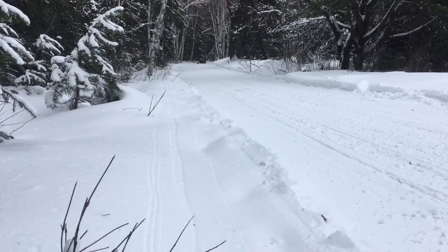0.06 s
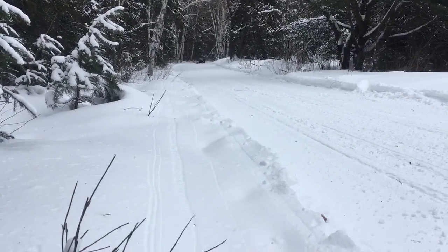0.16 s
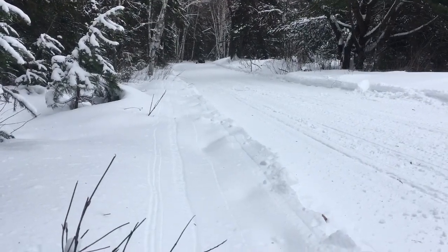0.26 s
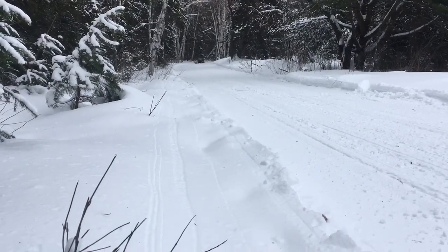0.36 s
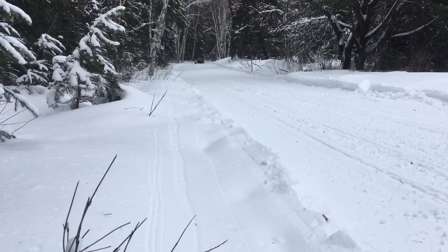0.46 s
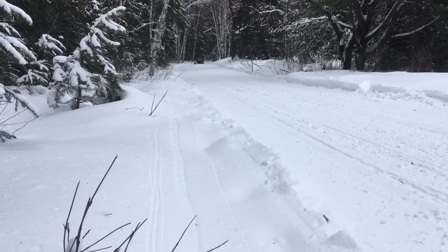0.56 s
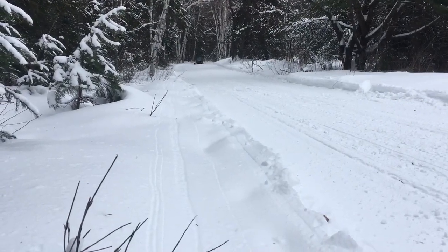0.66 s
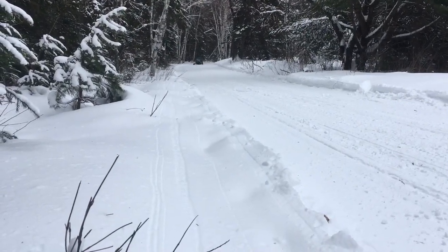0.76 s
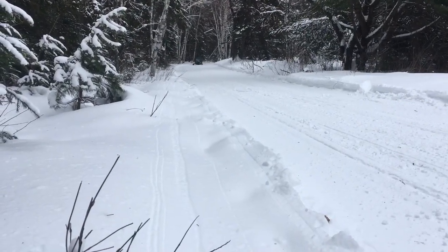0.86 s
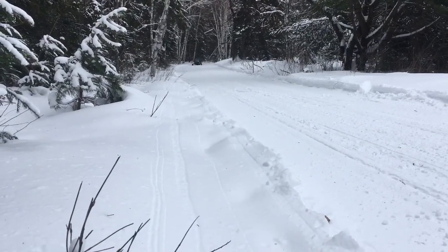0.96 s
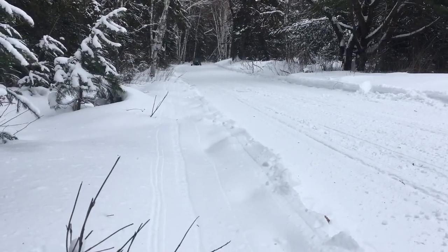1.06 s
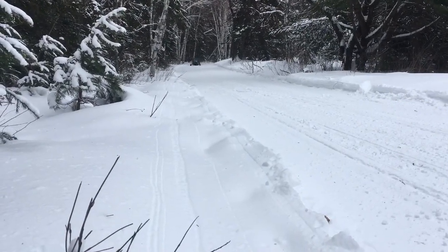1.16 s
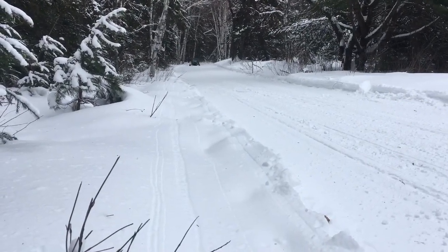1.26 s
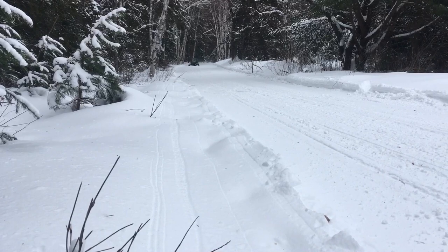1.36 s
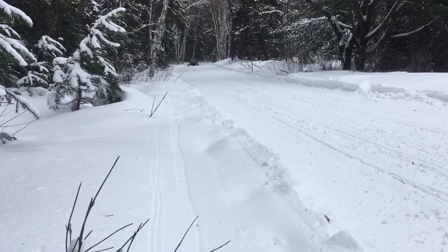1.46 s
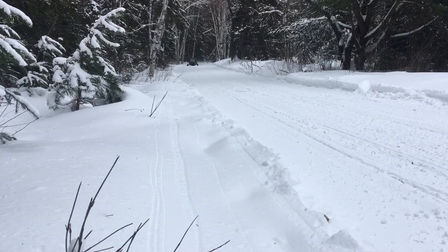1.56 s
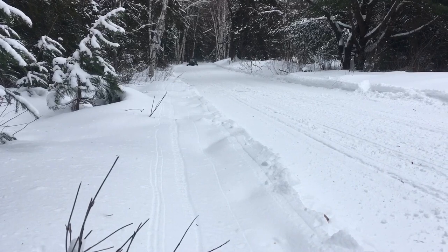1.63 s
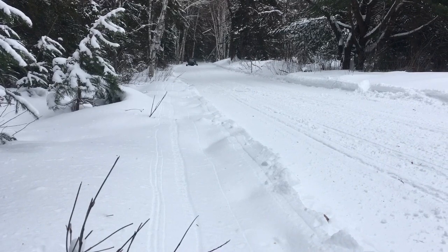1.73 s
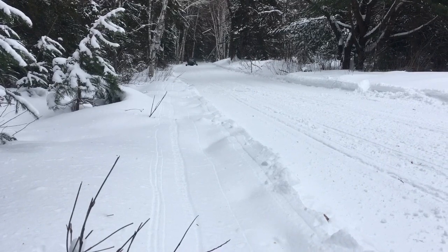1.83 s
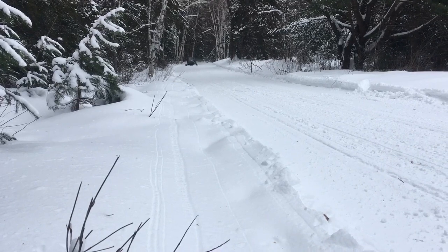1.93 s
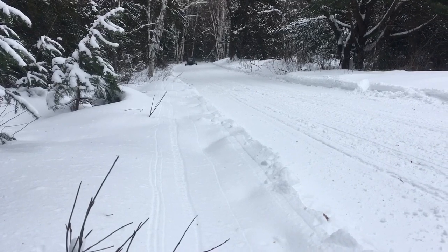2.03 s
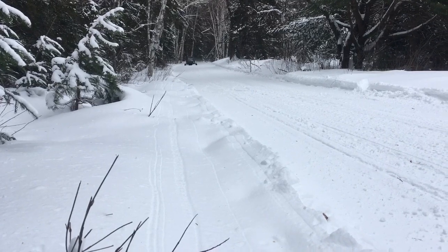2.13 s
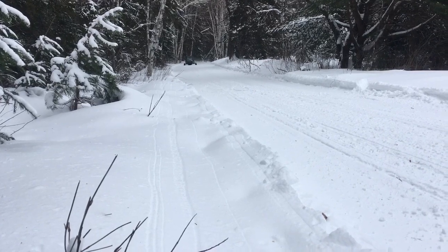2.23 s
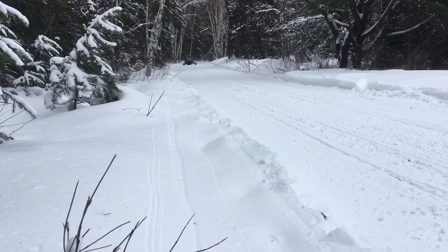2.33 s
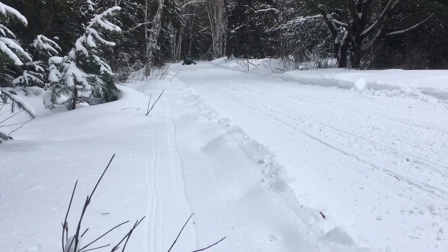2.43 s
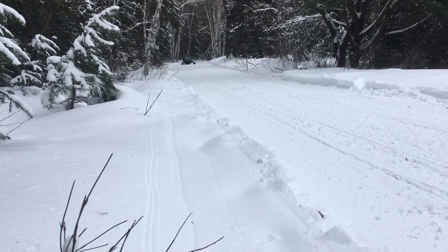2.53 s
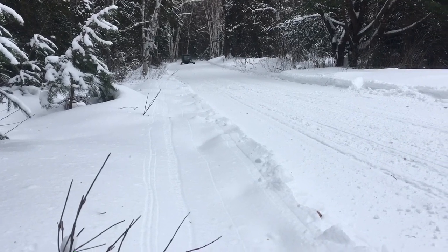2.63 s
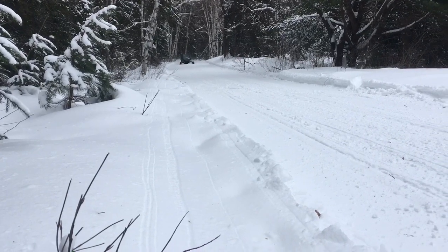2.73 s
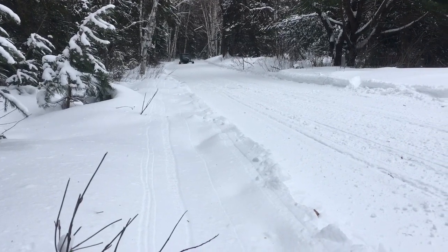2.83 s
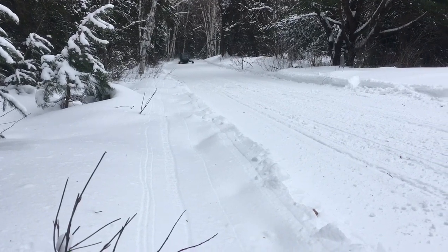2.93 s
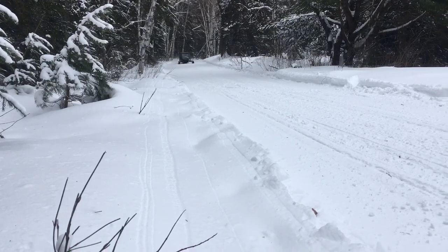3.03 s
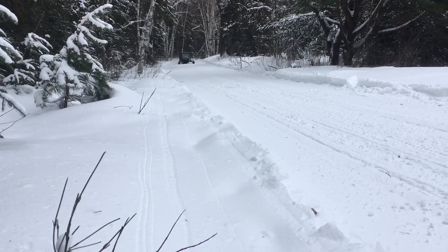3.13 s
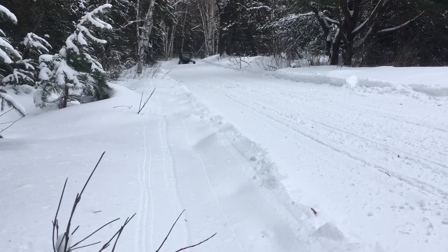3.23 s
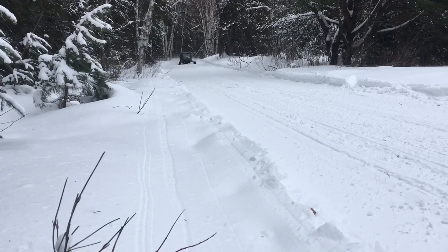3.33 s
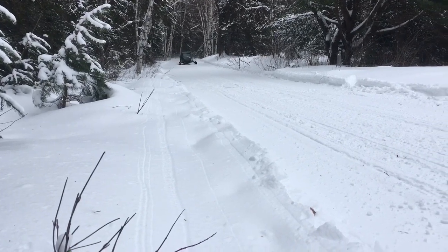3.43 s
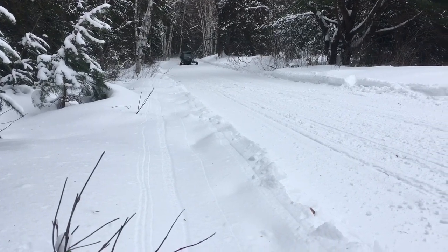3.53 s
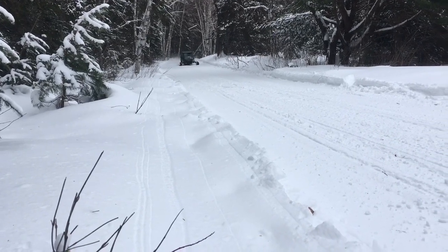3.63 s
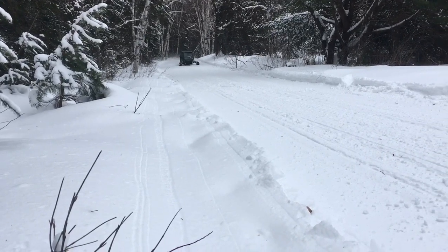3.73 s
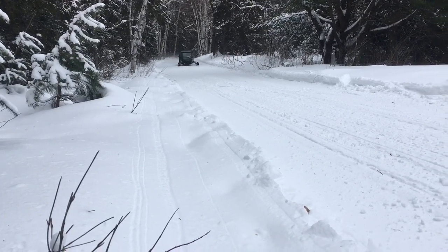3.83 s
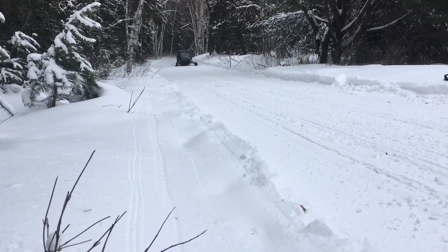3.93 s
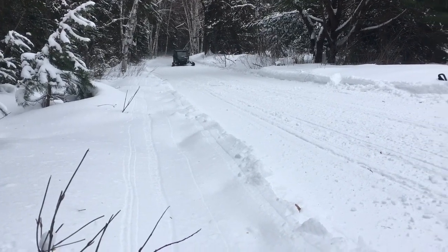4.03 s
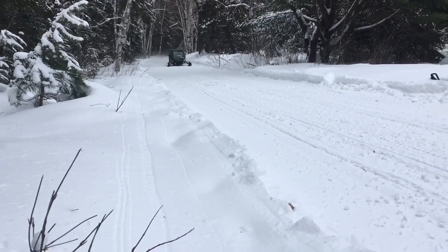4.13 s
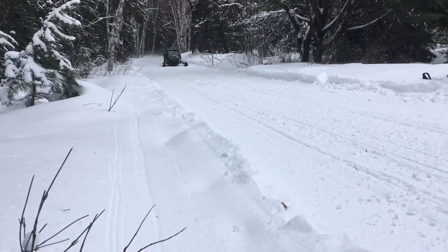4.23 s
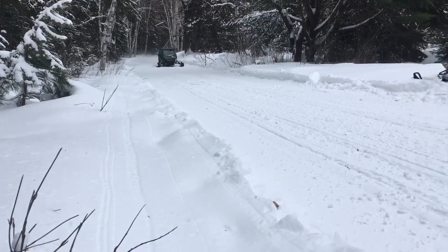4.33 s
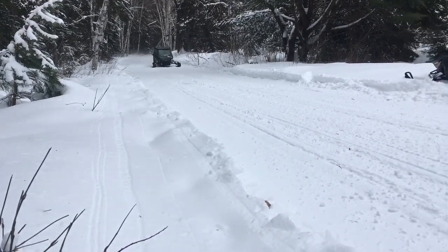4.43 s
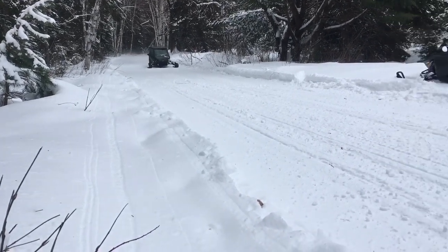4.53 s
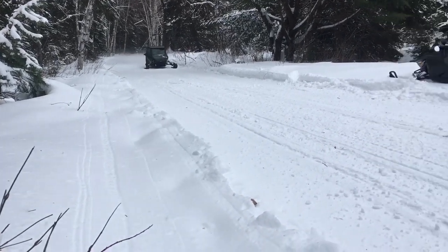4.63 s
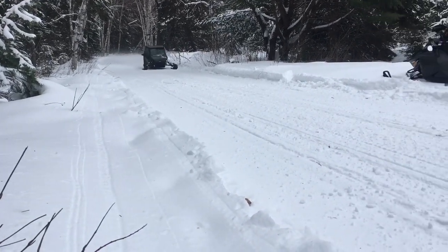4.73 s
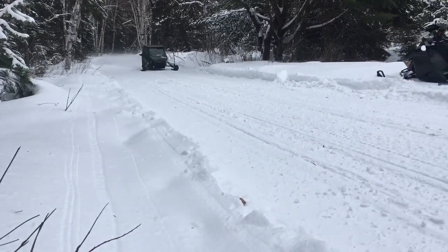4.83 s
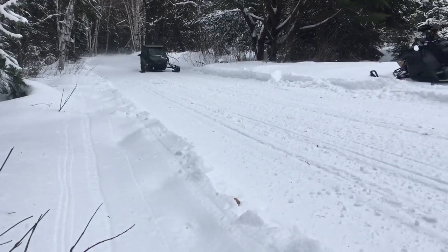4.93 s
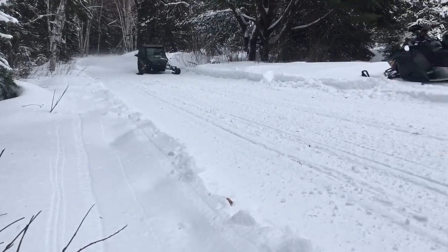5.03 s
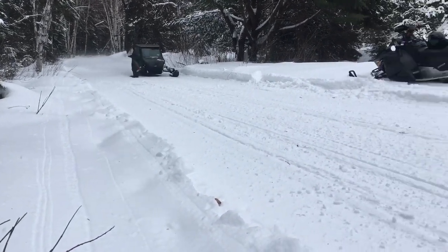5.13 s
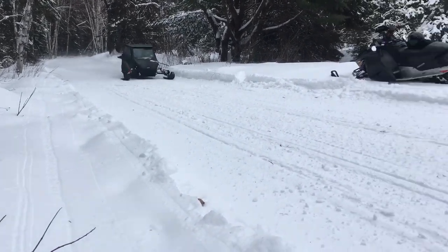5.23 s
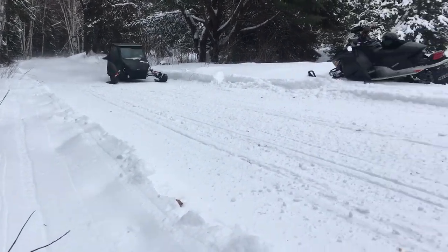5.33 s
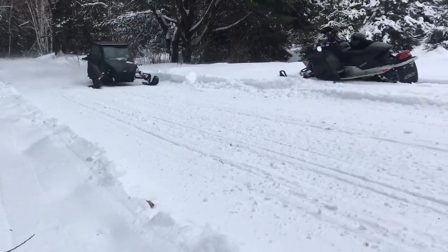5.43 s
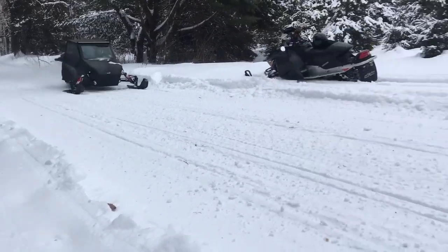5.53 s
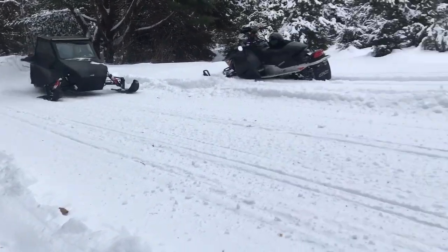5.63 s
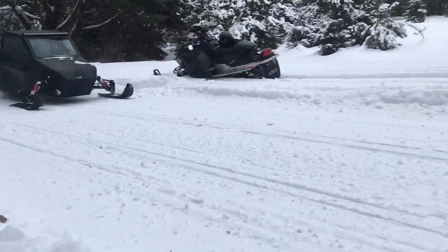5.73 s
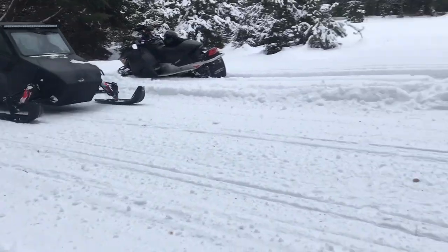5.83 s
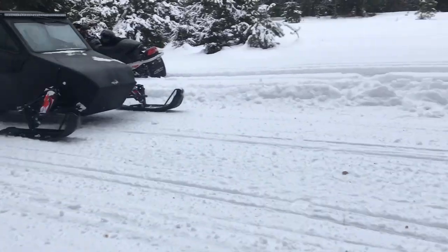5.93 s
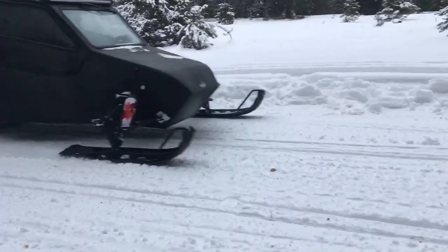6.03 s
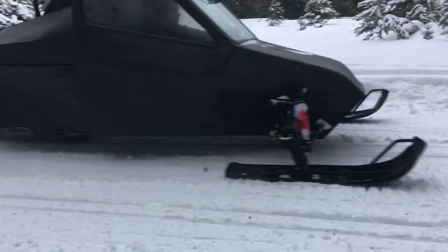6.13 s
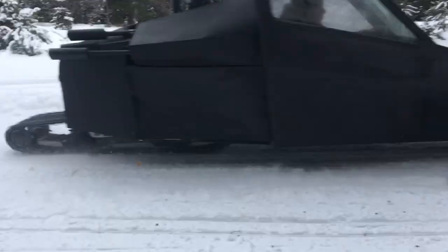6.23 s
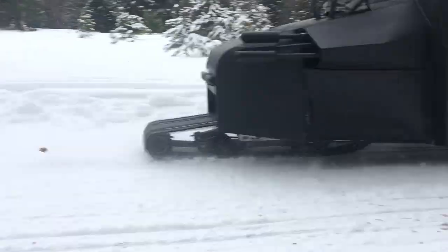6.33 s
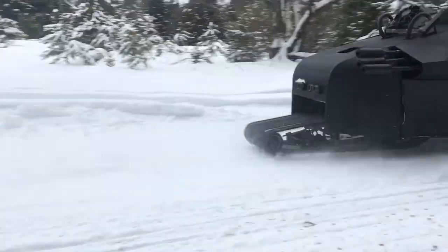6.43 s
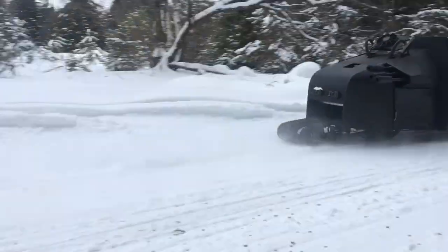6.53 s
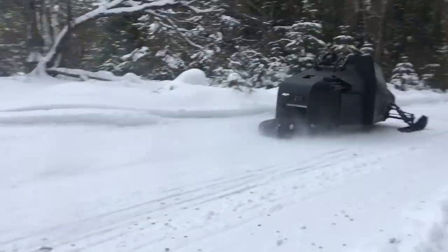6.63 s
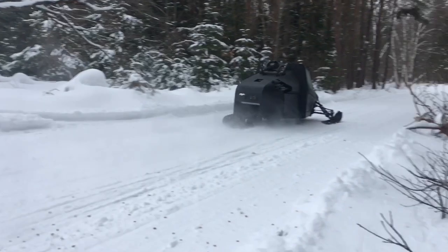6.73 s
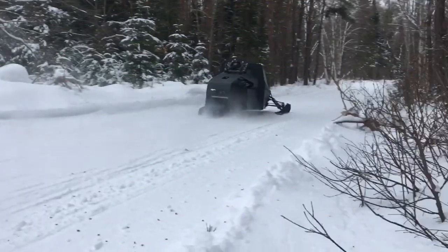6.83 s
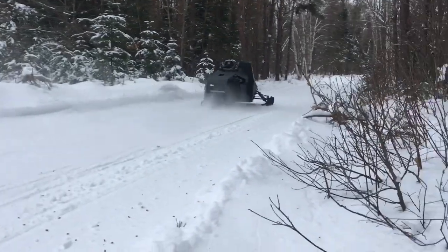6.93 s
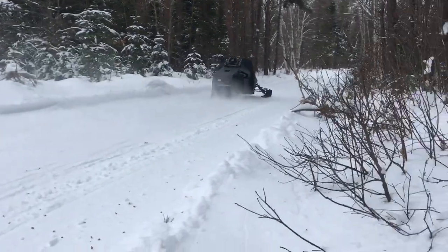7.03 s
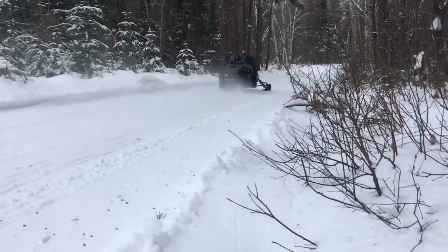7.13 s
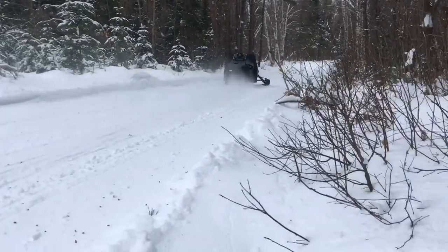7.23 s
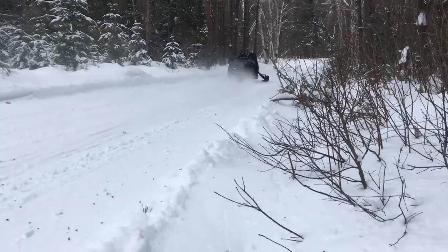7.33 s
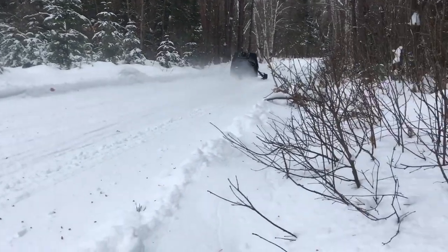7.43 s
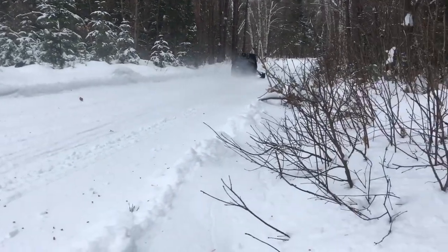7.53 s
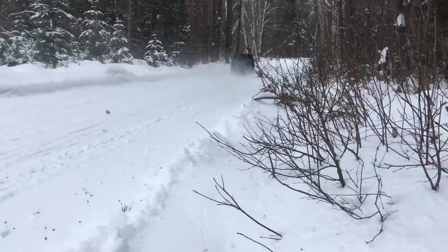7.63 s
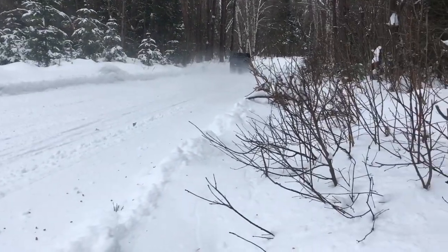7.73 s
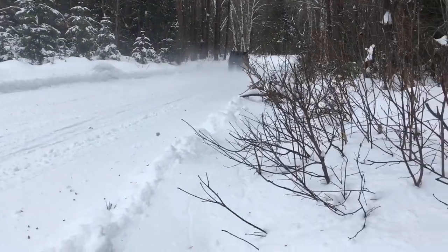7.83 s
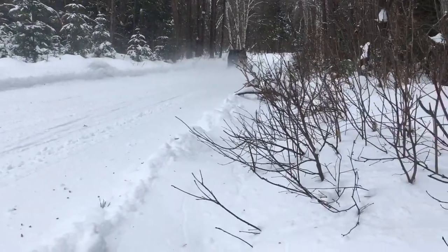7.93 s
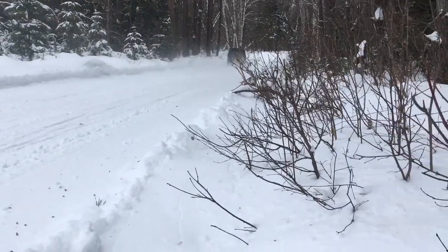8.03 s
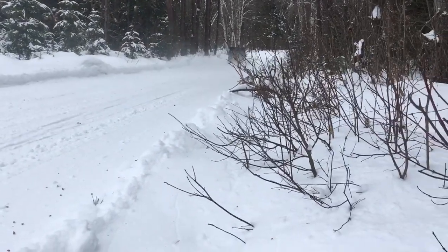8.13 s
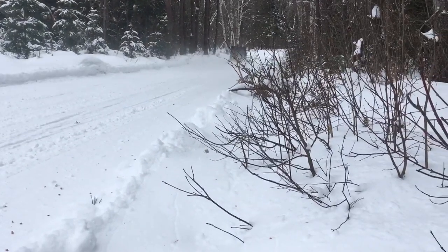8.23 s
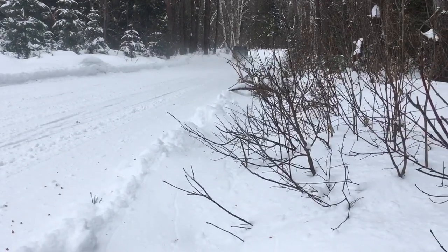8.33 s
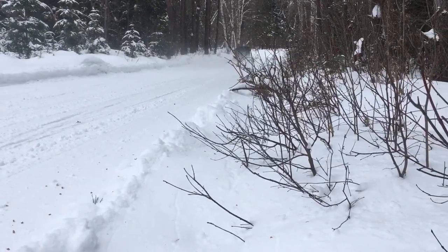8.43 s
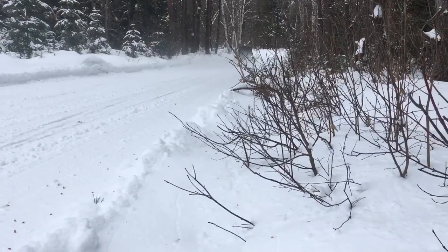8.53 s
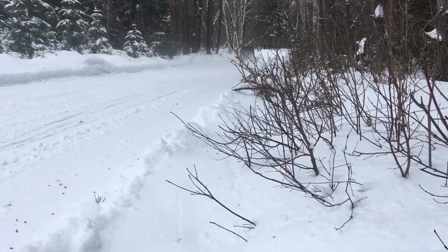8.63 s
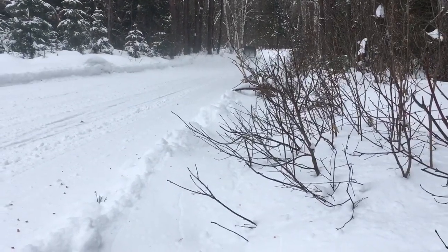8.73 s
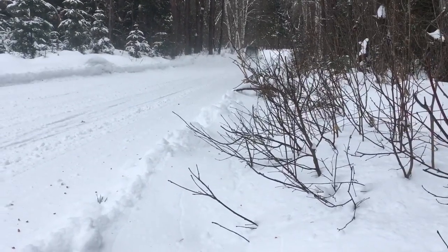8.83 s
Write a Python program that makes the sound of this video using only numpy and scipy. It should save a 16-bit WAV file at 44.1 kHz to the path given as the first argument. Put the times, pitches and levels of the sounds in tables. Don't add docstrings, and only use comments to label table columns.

```python
import sys
import numpy as np
from scipy import signal
from scipy.fft import rfft, irfft
from scipy.io import wavfile
from scipy.ndimage import uniform_filter1d

SR = 44100
rng = np.random.default_rng(int(sys.argv[2]) if len(sys.argv) > 2 else 0)


def waveform_to_disk(signal):
    frames = np.transpose(np.atleast_2d(signal))
    scaled = np.clip(frames, -1, 1) * 32767
    samples = np.round(scaled).astype(np.int16)
    wavfile.write(sys.argv[1], SR, samples)


def magnitude_from_level(level_db):
    exponent = np.asarray(level_db, float) / 20
    return 10 ** exponent


N = 391608
T = np.arange(N) / SR

# (t/s, view: 0 far up the trail, 1 nose-on, 2 passing, 3 tail-on, 4 leaving)
VIEW = [
    (0, 0),
    (2.2, 0),
    (2.7, 1),
    (6.03, 1),
    (6.17, 2),
    (6.3, 2),
    (6.44, 3),
    (6.58, 3),
    (6.8, 4),
]


def exhaust():
    # (level re nearness/dB, share of the throttle lift followed)
    drone = [(1.0, .3), (-.5, .2), (1.0, 0.92), (3.5, 0.98), (3, .8)]
    rasp = [(-12.5, 1.05), (-13, 1.45), (-14, 0.95), (-6, 0.94), (-1.5, .45)]
    # (bark shift before clearing/dB, gasp level/dB, tree echo level/dB, share of the gasp the echo follows)
    rough = [(0, -3, 5, 1), (0, 0, 4.5, .9), (3, 0, 2, 1), (7, -3, 2, 1), (5, 0, -5, .35)]
    # (bark level/dB, gasp level re the clean note/dB)
    clearing = [(-32, -1), (-21, -7), (-15, -12), (-11.5, -21)]
    # (t/s, gasp level/dB)
    fading = [
        (6.6, 0),
        (6.75, -9),
        (7.15, -6),
        (7.45, 0),
        (8.88, 4),
    ]
    # (f/Hz, level/dB per Hz)
    gasp_colour = [(250, -44), (420, -31), (471, -26), (579, -6), (1030, -9.5), (1170, -11), (1810, -11),
                   (2300, -23), (2740, -17.5), (5000, -23.5), (6500, -55), (11000, -120)]
    # (f/Hz, level/dB per Hz)
    tail_colour = [(300, -26.5), (470, -13.5), (560, -2), (680, -13), (760, -8.5), (900, -11), (1080, -6),
                   (1160, -0.5), (1300, -2.5), (1900, -17), (3000, -23), (5000, -41), (9000, -73)]
    # (delay/s, pitch ratio while it comes, pitch ratio while it leaves, level/dB)
    trees = [
        (.2, 0.98, 1.05, -5.5),
        (.45, .94, 1.08, -7),
    ]
    pass_s, shade_s = 6.2, 6.19
    knee_hz, drone_db_per_turn = 92, .45
    bounce_s = 0.00029

    crank = revs()
    view, = in_time(VIEW)

    shade_db = -4.0 * np.exp(-((T - shade_s) / .08) ** 2)
    bark_db = engine_db([(0, 1)] * 5) + shade_db
    detuned_db = drone_db_per_turn * np.minimum(crank - knee_hz, 0)
    drone_db = engine_db(drone) + shade_db + detuned_db
    rasp_db = engine_db(rasp) - 5.5 * np.exp(-((T - shade_s + .13) / 0.31) ** 2)

    shift_db, gasp_db, echo_db, follows = by_view(rough)
    gasp_db = gasp_db + np.interp(bark_db + shift_db, *np.transpose(clearing)) + in_time(fading)[0]
    echo_db = echo_db + follows * gasp_db

    turns = np.cumsum(crank) / SR
    direct = note(turns, view, gasp_db)
    puff = 0.86 + np.exp(-3.0 * (3 * turns % 1))
    gasp = rms_one(colour(puff * rng.standard_normal(N), gasp_colour))

    echo = 0
    for delay, coming, leaving, db in trees:
        ratio = np.interp(T, [pass_s - .1 + delay, pass_s + .3 + delay], [coming, leaving])
        late_crank = ratio * np.interp(T - delay, T, crank)
        late = firings(np.cumsum(late_crank) / SR, jitter=.004, uneven_db=2.0)
        echo = echo + magnitude_from_level(db) * scatter(late, t60=0.17)
    back = rms_one(colour(echo, tail_colour))
    wet = magnitude_from_level(-8.0) * scatter(direct, t60=0.47)
    heard = direct + magnitude_from_level(gasp_db) * gasp + magnitude_from_level(echo_db) * (back + wet)

    lag = bounce_s / np.hypot(1, (T - pass_s + 0.023) / 0.205) * SR
    ahead = np.interp(view, [1, 2], [1, 0])
    raspy = heard + .12 * ahead * gasp
    bounced = raspy + .7 * ahead * np.interp(np.arange(N) - lag, np.arange(N), raspy)

    waver_db = 1.82 * np.interp(gasp_db, [-18, -4], [.2, 1])
    bark_db = bark_db + .7 * waver_db * drift(4.2)
    drone_db = drone_db + waver_db * drift(5.4)
    rasp_db = rasp_db + 0.24 * waver_db * drift(5.2)
    return (magnitude_from_level(drone_db) * band(heard, 455, 770)
            + magnitude_from_level(bark_db) * band(heard, 860, 2004)
            + magnitude_from_level(rasp_db) * band(bounced, 2096, 4150, order=3))


def note(turns, view, gasp_db):
    # (multiple of crank speed, level/dB)
    afar = [(1, -17), (2, -22), (3, -24), (4, -10.5), (5, -15.5), (6, -2.5), (7, -2.5), (8, -12.5),
            (9, -11.5), (10, -8.5), (11, -15), (12, -2.5), (13, -8), (14, -11), (15, -18), (16, -18),
            (17, -21.5), (18, -13.5)]
    nose_on = [(4, -28), (5, -7.5), (6, -7.5), (7, -16.5), (8, -7.5), (9, 1), (10, 1), (11, -0.5),
               (12, -5.5), (13, 0), (14, -5), (15, -12.5), (16, -5), (17, -14.5), (18, -27), (19, -12),
               (20, -13.5), (21, -41), (22, -12.5), (23, -13), (24, -31), (25, -14.5), (26, -14),
               (27, -25.5), (28, -18), (29, -20.5), (30, -29), (31, -23), (32, -20)]
    passing = [(1, -21), (2, -16), (3, -10), (4, -21), (5, 3), (6, 4), (7, -3.5), (8, -14), (9, -8),
               (10, -4), (11, -9), (12, 2.5), (13, -21), (14, -10.5), (15, -17), (16, -18), (17, -15.5),
               (18, -22)]
    alongside = [(4, -15.5), (5, 3.5), (6, -8), (7, -8.5), (8, -13.5), (9, -7.5), (10, -20), (11, -4),
                 (12, -12), (13, -21), (14, -9), (15, -36), (16, -17), (17, -23), (18, -24.5), (19, -50),
                 (20, -27.5), (21, -31), (22, -42), (23, -28), (24, -33), (25, -29), (26, -42), (27, -29),
                 (28, -29), (29, -44), (30, -28), (31, -25.5), (32, -44)]
    leaving = [(1, -11), (2, -21), (3, -12), (4, -31), (5, -12.5), (6, 0.5), (7, -6.5), (8, -7.5),
               (9, -9.5), (10, -5), (11, -11), (12, -3.5), (13, -7.5), (14, -10), (15, -11), (16, -29),
               (17, -13), (18, -17), (19, -18.5), (20, -36), (21, -22), (22, -21)]
    views = (afar, nose_on, passing, alongside, leaving)

    out = np.zeros(N)
    unsteady = turns + .003 * drift(30)
    flutter = np.interp(gasp_db, [-18, -4], [.25, 1])
    for k in range(4, 37):
        views_db = [np.interp(k, *np.transpose(t), right=-12 - 0.65 * k) for t in views]
        level_db = np.interp(view, np.arange(5), views_db)
        level = magnitude_from_level(level_db + (3 + .12 * k) * flutter * drift(9))
        lead = 2 * np.pi / 3 * (k % 3 > 0) - 4 * np.log(k)
        wander = .22 * min(k, 12) * flutter ** 2 * drift(6)
        out += level * np.sin(2 * np.pi * k * unsteady + lead + wander)
    return out / np.sqrt(uniform_filter1d(out ** 2, size=6000))


def firings(turns, jitter, uneven_db):
    # (share of a turn, level/dB)
    cylinders = [
        (0, 0),
        (.335, -9),
        (.672, -12),
    ]
    pulses = np.zeros(N + 2)
    whole = np.arange(1, int(turns[-1]) - 1)
    for share, db in cylinders:
        luck = rng.standard_normal((1200, 2))[:len(whole)]
        at = np.interp(whole + share + jitter * luck[:, 0], turns, np.arange(N))
        size = magnitude_from_level(db + uneven_db * luck[:, 1])
        np.add.at(pulses, at.astype(int), size * (1 - at % 1))
        np.add.at(pulses, at.astype(int) + 1, size * (at % 1))
    return pulses[:N]


def scatter(x, t60):
    tail = rng.standard_normal(SR // 2) * magnitude_from_level(-60 * T[:SR // 2] / t60)
    return rms_one(signal.fftconvolve(x, tail)[:N])


def low_orders():
    # (level re nearness/dB, share of throttle lift followed)
    first_views = [(-12.5, -.1), (-14.5, -0.39), (-9, -0.4), (-16, -.3), (-9, 0.108)]
    firing_views = [(-23, 2.1), (-24.5, 1.7), (-18, 1.8), (-23, 1.86), (-2, .3)]
    # (t/s, half length/s, level/dB)
    labours = [(3.13, 0.12, -42), (4.093, 0.11, -38), (4.817, 0.11, -30), (5.12, 0.18, -39),
               (5.61, 0.18, -33.5), (6.9, .17, -34), (7.77, 0.37, -26), (8.65, .3, -42)]
    drop_s = 7.8

    angle = 2 * np.pi * np.cumsum(revs()) / SR
    steady = magnitude_from_level(engine_db(first_views))
    labour = sum(magnitude_from_level(db) * np.exp(-((T - s) / half) ** 2) for s, half, db in labours)
    first = (steady + labour) * magnitude_from_level(-3.5 + 1.3 * drift(3.3)) * np.sin(angle)
    second_level = (steady + .3 * labour) * magnitude_from_level(-9.0 + 3.0 * drift(15))
    second = second_level * np.sin(2 * angle + 0.23 * drift(12))
    drop_db = np.interp(T, [drop_s, drop_s + .12], [0, -7])
    third_db = engine_db(firing_views, power=.55) + drop_db + 2.9 * drift(11.7)
    third = magnitude_from_level(third_db) * np.sin(3 * angle)
    return first + second + third


def revs():
    # (t/s, crank speed/turns per s)
    crank_speed = [
        (0, 90),
        (1.0, 94.4),
        (2.36, 98.8),
                   (2.83, 108.4), (3.09, 100.8), (3.63, 112.9), (4.08, 103.5), (4.54, 112.6), (4.7, 102.8),
                  (4.891, 98.65), (6.0, 118.2), (6.57, 117.1), (6.8, 100.6), (7.07, 89.47), (7.41, 84.93),
                  (7.78, 102.6), (8.18, 88.24), (8.88, 72.76)]
    surge_s = .3
    speed_m_s, closest_m, abeam_s = 16.1, 1.1, 6.11

    s, turns = np.transpose(crank_speed)
    t = np.clip(T, 0, s[-1])
    i = np.clip(np.searchsorted(s, t) - 1, 0, len(s) - 2)
    span = np.diff(s)[i]
    step = np.diff(turns)[i]
    lag = np.where(step / span > 8, surge_s, 1e3)
    progress = np.expm1((s[i] - t) / lag) / np.expm1(-span / lag)
    crank = uniform_filter1d(turns[i] + step * progress, size=2600, mode="nearest")
    along = speed_m_s * (t - abeam_s)
    return crank * (1 - speed_m_s / 343 * along / np.hypot(along, closest_m))


def engine_db(part, power=1.0):
    # (opens t/s, full t/s, shuts t/s, died away t/s, lift of the exhaust/dB)
    blips = [
        (2.5, 2.79, 2.83, 3.0, 5.5),
        (3.05, 3.5, 3.6, 4.05, 9),
        (4.06, 4.42, 4.54, 4.67, 8),
        (4.82, 5.2, 6.56, 6.71, 12),
        (7.41, 7.46, 7.77, 7.92, 11.5),
    ]
    # (t/s, level/dB)
    nearness = [
        (0, -39.5),
        (2.4, -34),
        (4.8, -27.5),
        (5.9, -22.5),
        (6.55, -26.5),
        (6.72, -38.5),
        (6.95, -38),
        (7.4, -33),
        (8.88, -36),
    ]
    lift = sum(np.interp(T, [opens, full, shuts, gone], [0, db, db, 0])
               for opens, full, shuts, gone, db in blips)
    own_db, share = by_view(part)
    return in_time(nearness)[0] + own_db + share * 12 * (lift / 12) ** power


def track():
    # (t/s, f/Hz, level/dB)
    lugs = [(3.2, 240.0, -65), (3.77, 257.6, -48.5), (4.02, 249.9, -51.5), (4.55, 270, -45),
            (4.83, 244.4, -55.5), (5.02, 259.6, -42.5), (5.78, 282.6, -46), (6.06, 287.2, -38),
            (6.7, 263, -35)]
    hz, db = in_time(lugs)
    running = np.interp(T, [3.0, 3.3, 6.55, 6.75], [0, 1, 1, 0])
    tone = np.sin(2 * np.pi * np.cumsum(hz) / SR)
    return running * magnitude_from_level(db + 5.5 + 2.9 * drift(19)) * tone


def snow():
    # (t/s, hiss level/dB, dulling by distance and spray/dB)
    spray_levels = [(0, -58.5, -15), (1.3, -55, -15), (2.4, -53, -11), (3.04, -49, -8), (3.46, -46, -4),
                    (4.28, -43, -4), (4.7, -42, -3.5), (5.07, -38.5, -3), (5.32, -32, -8), (6.0, -32, -7.5),
                    (6.28, -29.5, -3), (6.56, -29.5, -9), (6.68, -40.5, -7), (7.1, -40.5, -8),
                    (7.42, -34.5, -8.5), (8.1, -40.5, -7.5), (8.66, -40.5, -11.5), (8.88, -42.5, -13)]
    # (top sizzle level/dB, share of the dulling it follows, rumble level/dB)
    gear = [(-5.5, 0.63, -2), (-2, 0.96, 0), (-4, .8, -9), (-1, .7, -6), (-5, .7, .5)]
    # (f/Hz, level/dB per Hz)
    spray_colour = [(1500, -1), (2600, -38), (4200, 3), (4900, -2), (5800, 2), (6900, 1), (7500, -3.5),
                    (9000, -1.5), (9900, 0), (10400, 0.5), (11300, 2.5), (13500, -6.5), (15700, -8)]
    # (f/Hz, level/dB per Hz)
    rumble_colour = [(12, -39), (20, -39), (49, -1), (97, -1), (145, -2), (203, -4.5), (338, -5),
                     (425, -12), (500, 3), (650, -14), (1100, -120)]

    hiss_db, sizzle_db = in_time(spray_levels)
    top_db, follows, rumble_db = by_view(gear)
    top_db = top_db + follows * sizzle_db
    rumble_db = hiss_db + rumble_db
    hiss_db = hiss_db + 0.62 * drift(6.4)
    clumps = drift(16.0)

    clicks = rng.choice([-1, 1], N) * (rng.random(N) < 6000 / SR)
    crunch = magnitude_from_level(2.7 * rng.exponential(1, N)) * clicks
    spray = colour(rng.standard_normal(N) + 0.79 * rms_one(crunch), spray_colour)
    hiss = magnitude_from_level(hiss_db + .5 * clumps) * band(spray, 4000, 9000)
    sizzle = magnitude_from_level(hiss_db + sizzle_db + 1.1 * clumps) * band(spray, 9000, 12500)
    top = magnitude_from_level(hiss_db + top_db + 1.4 * clumps) * band(spray, 12500, 17000)
    rumble_noise = rms_one(colour(rng.standard_normal(N), rumble_colour))
    rumble = magnitude_from_level(rumble_db + 1.6 * drift(7.1)) * rumble_noise
    return hiss + sizzle + top + rumble


def wind():
    # (t/s, length/s, level/dB, top f/Hz)
    puffs = [(0.785, 0.079, -48.5, 263), (6.223, 0.19, -27.5, 264), (7.18, 0.054, -44, 219),
             (7.936, 0.0041, -34, 1500), (8.002, 0.048, -38, 130.9), (8.067, .012, -20, 170),
             (8.098, .016, -19, 169.9), (8.172, 0.037, -31, 199), (8.439, 0.03, -37, 159.7),
             (8.531, 0.016, -28.5, 150), (8.581, 0.015, -33, 170), (8.701, 0.04, -43, 170.1)]
    out = np.zeros(N)
    air = rng.standard_normal(N)
    for s, length, db, top_hz in puffs:
        near = slice(int((s - .5) * SR), int((s + .5) * SR))
        low_pass = signal.butter(3, [45, top_hz], "band", fs=SR, output="sos")
        low = signal.sosfilt(low_pass, air[near])
        lump = low * np.exp(-((T[near] - s) / length) ** 2)
        out[near] += magnitude_from_level(db) * rms_one(lump) * np.sqrt(length * SR / len(lump))
    return out


def by_view(rows):
    view, = in_time(VIEW)
    return [np.interp(view, np.arange(5), c) for c in np.transpose(rows)]


def in_time(rows):
    s, *columns = np.transpose(rows)
    return [np.interp(T, s, c) for c in columns]


def rms_one(x):
    return x / np.sqrt(np.mean(x ** 2) + 1e-20)


def drift(rate):
    r = np.exp(-80 * np.pi * rate / SR)
    slow = signal.lfilter([1], [1, -2 * r, r * r], rng.standard_normal(N // 40 + 2002))[2000:]
    return np.interp(np.arange(N) / 40, np.arange(len(slow)), rms_one(slow))


def colour(x, points, size=4096):
    hz = np.maximum(np.fft.rfftfreq(size, 1 / SR), 1)
    points_hz, points_db = np.transpose(points)
    level = np.interp(np.log(hz), np.log(points_hz), points_db)
    cepstrum = irfft(np.log(magnitude_from_level(level)))
    cepstrum[1:size // 2] *= 2
    cepstrum[size // 2 + 1:] = 0
    return signal.fftconvolve(x, irfft(np.exp(rfft(cepstrum))))[:N]


def band(x, low_hz, high_hz, order=4):
    y = signal.sosfilt(signal.butter(order, [low_hz, high_hz], "band", fs=SR, output="sos"), x)
    power = uniform_filter1d(uniform_filter1d(y ** 2, size=2400), size=2400)
    return y / np.sqrt(power + 1e-12)


def scene():
    return (exhaust() + low_orders() + track() + snow() + wind())[None]


def band_limit(x):
    return signal.sosfilt(signal.butter(12, 15730, fs=SR, output="sos"), x)


def record(dry):
    held = np.clip(dry, -.97, .97)
    return band_limit(held)


dry = scene()
out = record(dry)
waveform_to_disk(out)
```